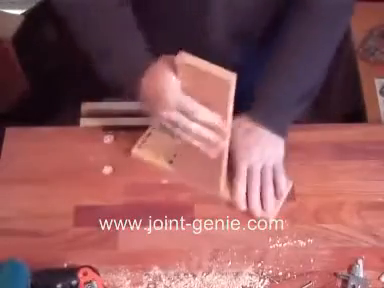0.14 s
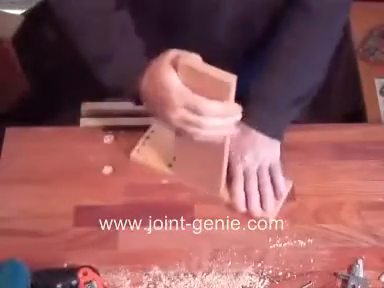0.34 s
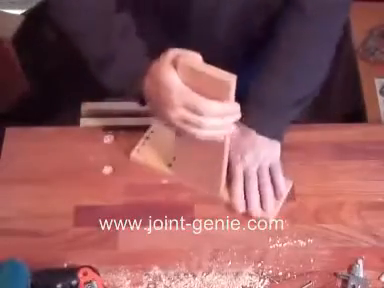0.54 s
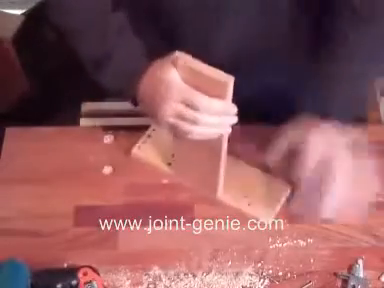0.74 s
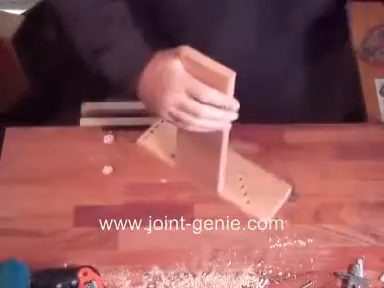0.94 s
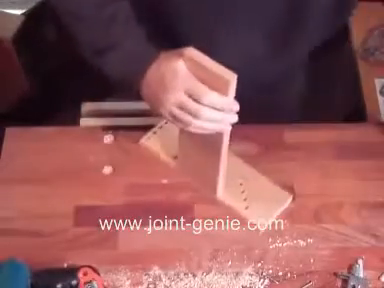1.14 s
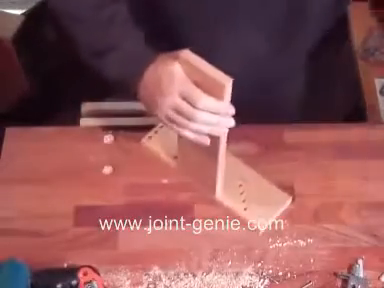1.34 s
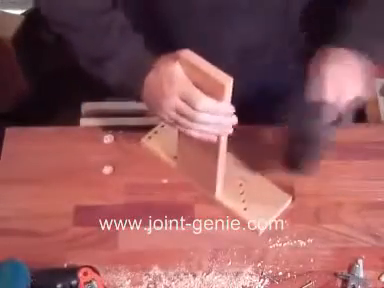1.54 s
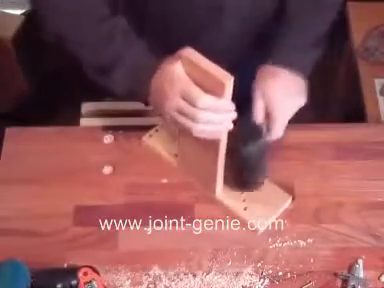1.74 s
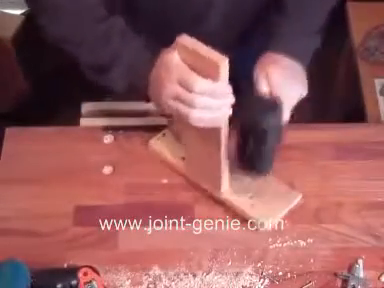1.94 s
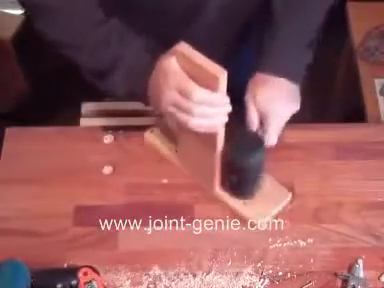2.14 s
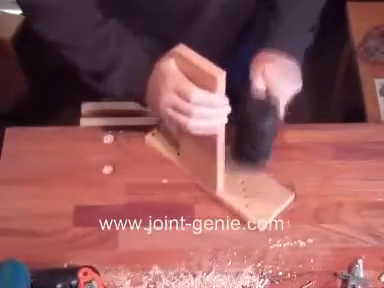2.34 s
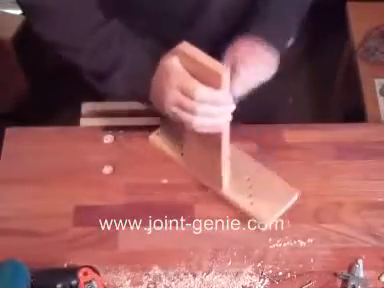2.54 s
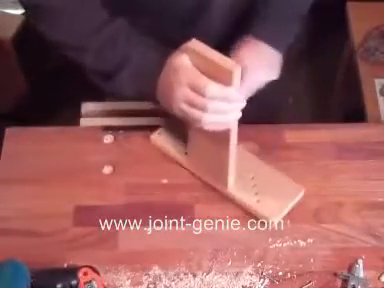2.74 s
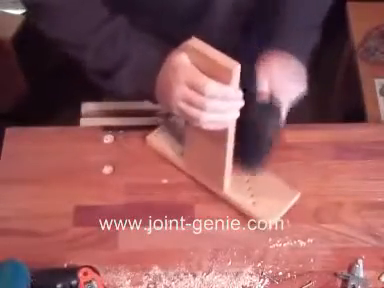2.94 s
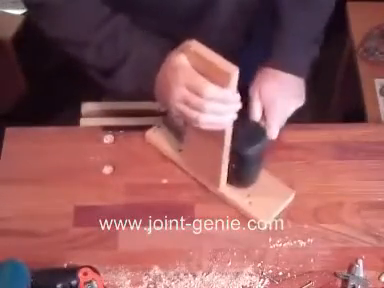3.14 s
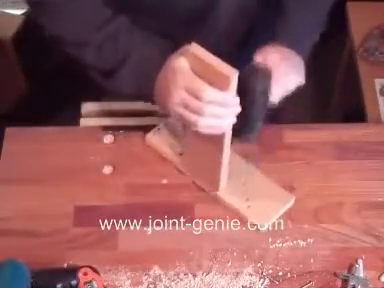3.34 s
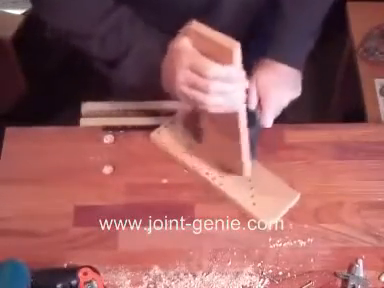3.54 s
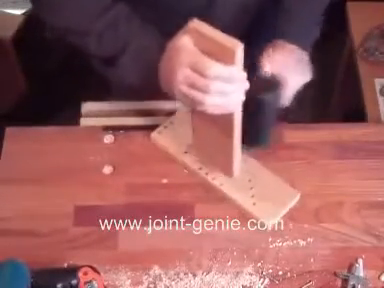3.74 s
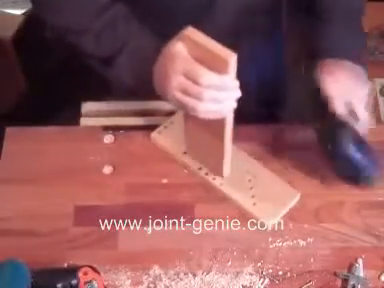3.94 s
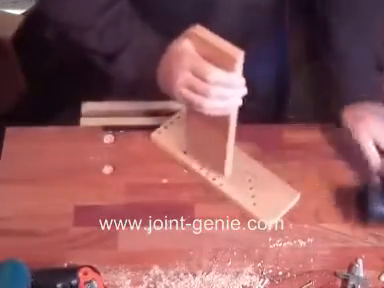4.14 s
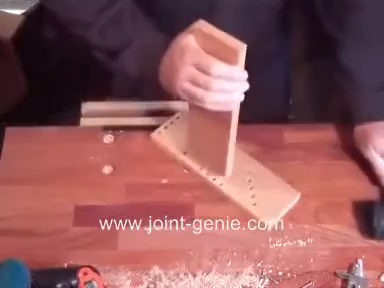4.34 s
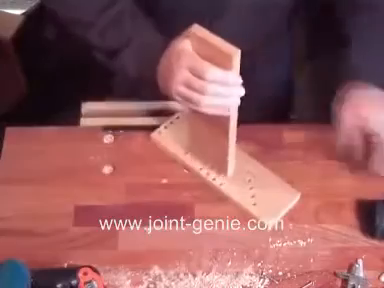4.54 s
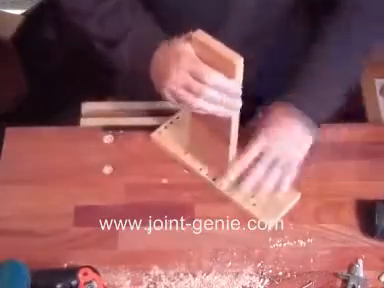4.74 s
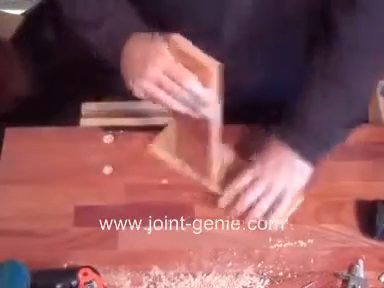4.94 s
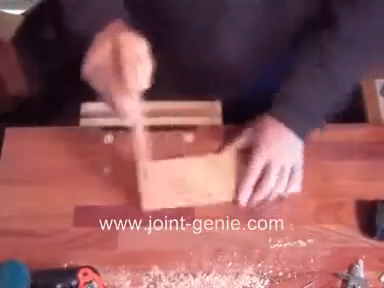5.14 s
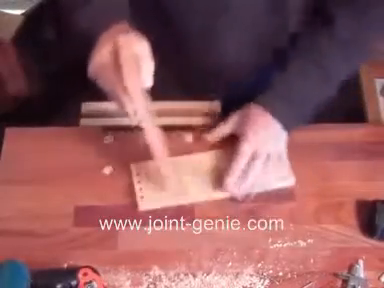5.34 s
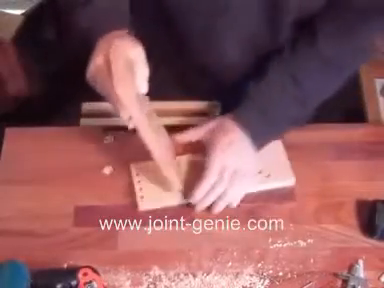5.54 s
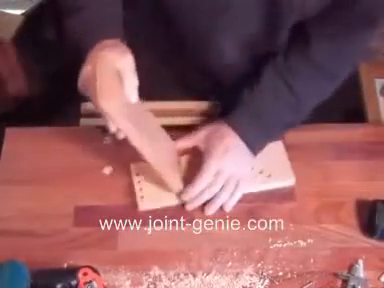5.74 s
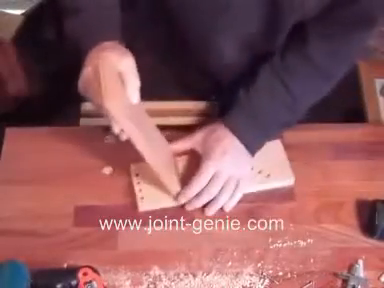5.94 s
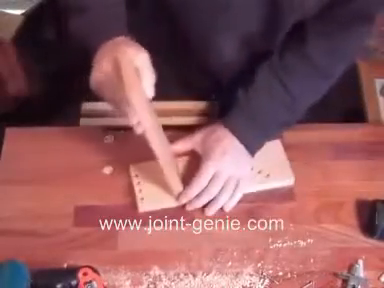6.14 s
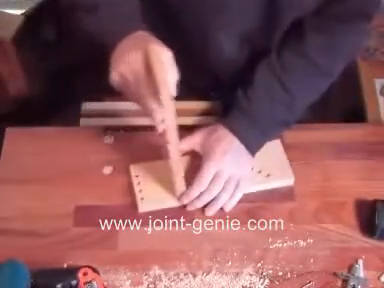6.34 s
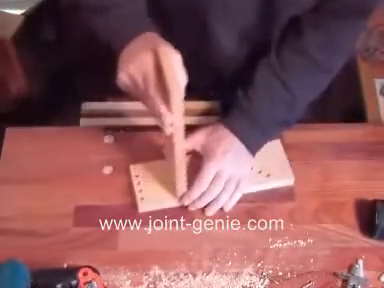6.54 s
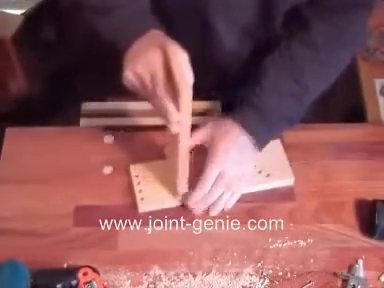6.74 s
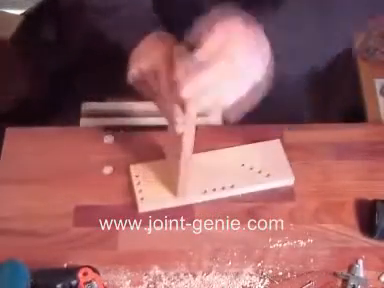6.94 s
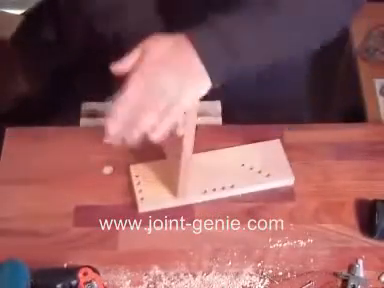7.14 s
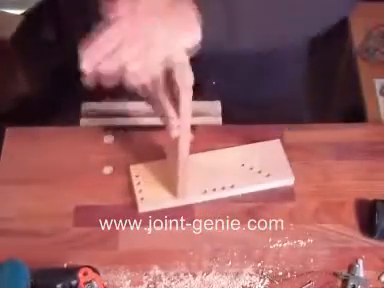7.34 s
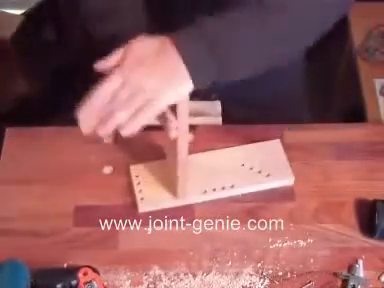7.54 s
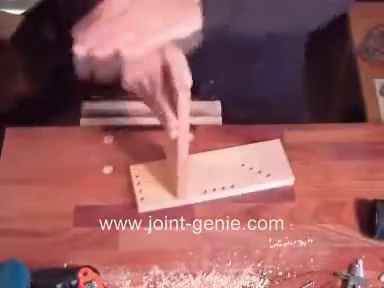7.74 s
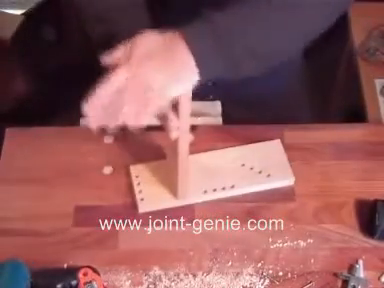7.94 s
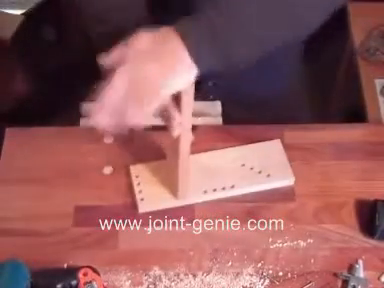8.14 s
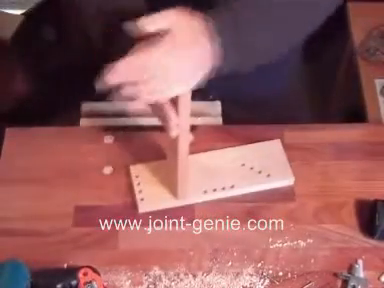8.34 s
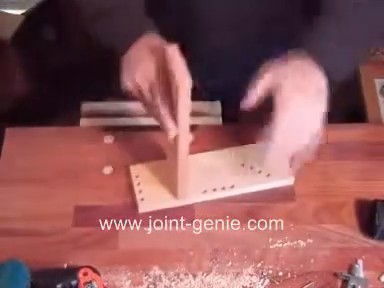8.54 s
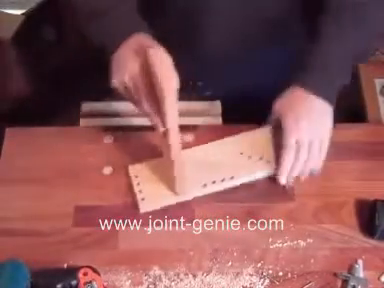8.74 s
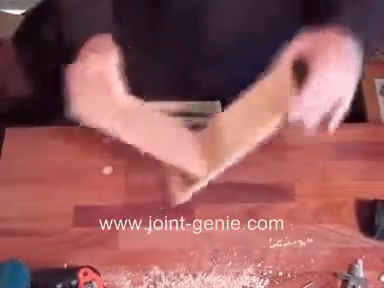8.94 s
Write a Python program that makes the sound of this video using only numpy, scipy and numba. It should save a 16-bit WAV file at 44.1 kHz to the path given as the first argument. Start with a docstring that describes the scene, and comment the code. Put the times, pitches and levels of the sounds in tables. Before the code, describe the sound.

Wooden boards handled on a bench, with short room reverberation and soft air noise. Early knock and brief grainy scrapes, then loud uneven mallet cracks that overload the microphone slightly, soft low thuds, a strong sliding scrape and light ticks. Near the end four regular slaps of a hand seat the board, with thumps, rattles and tinkling steel, then a faint slide.

```python
"""A mallet knocks an upright board out of its dowel joint: noise-like contacts excite damped wood modes.
The boards slide and tick (patchy filtered noise, light knocks) and the mallet is laid down; a palm then
drives the board home in stages while a loose steel part jingles as a sum of decaying sines. Room air and
a wavering low hum lie beneath. The camera lowers its gain too slowly for hard blows, limits the peaks,
and lets the gain back up under the room's tail; it adds faint steady tones of its own."""
import sys
import numpy as np
from scipy import signal
from scipy.fft import rfft, irfft, next_fast_len
from scipy.io import wavfile
from scipy.ndimage import uniform_filter1d, map_coordinates
from numba import njit

SR = 44100
rng = np.random.default_rng(int(sys.argv[2]) if len(sys.argv) > 2 else 0)


def master(y):
    """Save y as 16-bit WAV."""
    cut = np.clip(np.atleast_2d(y).T, -1, 1)
    pcm = np.round(cut * 32767)  # scale
    wavfile.write(sys.argv[1], SR, pcm.astype(np.int16))


N = 395923

# interchannel coherence of sound straight from the source: f/Hz, left-right likeness [0-1]
DIRECT_COHERENCE = [(60, 0.96), (3000, 0.98), (8000, .85), (15000, 0.74)]
# interchannel coherence of diffuse sound: f/Hz, left-right likeness [0-1]
ROOM_COHERENCE = [(60, 0.99), (1400, 0.96), (3100, 0.89), (7000, 0.59), (15000, 0)]


def amp(db):
    """Level to amplitude ratio: 20 dB is a factor of ten."""
    return 10 ** (np.asarray(db) / 20)


def unit(x):
    """Normalisation to an rms of one."""
    return x / np.sqrt(np.mean(x ** 2) + 1e-20)


def along(points, hz):
    """Interpolation of (f/Hz, value) points on a logarithmic frequency axis."""
    f, values = np.transpose(points)
    return np.interp(np.log(hz + 1), np.log(f + 1), values)


def curve(tables, column, outside):
    """Envelope by linear interpolation of one column of several time tables, then smoothing."""
    out = np.full(N, float(outside))
    t = np.arange(N) / SR
    for rows in map(np.array, tables):
        inside = (t >= rows[0, 0]) & (t <= rows[-1, 0])
        out[inside] = np.interp(t[inside], rows[:, 0], rows[:, column])
    return uniform_filter1d(out, size=400)


def wobble(rate):
    """Slow random modulation: a spline through Gaussian knots, rate knots a second."""
    knots = rng.standard_normal(int(N * rate / SR) + 4)
    return map_coordinates(knots, [np.arange(N) * rate / SR])


def filtered(x, response):
    """Linear filtering: the spectrum of x times a complex response of frequency."""
    n = x.shape[-1]
    padded = next_fast_len(n + SR // 5)
    spectrum = rfft(x, padded) * response(np.fft.rfftfreq(padded, 1 / SR))
    return irfft(spectrum, padded)[..., :n]


def resonances(modes, f):
    """Modal superposition: damped resonators (f/Hz, bandwidth/Hz, level/dB) of alternating sign."""
    total = 0
    for k, (centre, width, db) in enumerate(modes):
        damping = 1j * f * width
        total = total + (-1) ** k * amp(db) * damping / (centre * centre - f * f + damping)
    return total


def causal(points):
    """Minimum phase: folding the cepstrum of (f/Hz, level/dB) points gives a pulse that starts at once."""
    gain = amp(along(points, np.fft.rfftfreq(4096, 1 / SR)))
    cepstrum = irfft(np.log(gain))
    cepstrum[1:2048] *= 2
    cepstrum[2049:] = 0
    return irfft(np.exp(rfft(cepstrum)))


def spread(pair, coherence):
    """Interchannel coherence: unrelated mid and side noises, rotated into a left and a right."""
    def weights(hz):
        angle = np.arccos(np.clip(along(coherence, hz), -1, 1)) / 2
        return np.array([np.cos(angle), np.sin(angle)])

    mid, side = filtered(pair, weights)
    return np.array([mid + side, mid - side])


def patchy(depth_db):
    """Time-frequency modulation: two noises whose strength shifts in short patches of pitch and time."""
    z = signal.stft(rng.standard_normal((2, N)), nperseg=256)[2]
    field = rng.standard_normal(z.shape[1:])
    field = uniform_filter1d(field, size=4, axis=0)
    field = uniform_filter1d(field, size=8, axis=1)
    return signal.istft(z * amp(depth_db * unit(field)), nperseg=256)[1][:, :N]


def add(track, s, sound):
    """Superposition: mix a sound into the track at s seconds."""
    part = track[:, max(round(s * SR), 0):][:, :sound.shape[1]]
    part += sound[:, :part.shape[1]]


def in_room(x, wet_db):
    """Reverberation: convolution with noise whose decay depends on frequency."""
    # main decay: f/Hz, t60/s
    decay_times = [(60, 0.5), (200, 0.42), (1000, 0.4), (3000, 0.4), (8000, 0.33), (14000, 0.16)]
    hz, t, z = signal.stft(rng.standard_normal((2, SR * 2 // 3)), SR, nperseg=256)
    fall_db = -60 * t / along(decay_times, hz)[:, None]
    far_corners = amp(-35.5 + 0.46 * fall_db)  # fainter and slower, so it outlasts the main decay
    build_up = 1 - np.exp(-t / 0.0036)  # over the first walls
    decay = (amp(fall_db) + far_corners) * build_up
    tail = spread(signal.istft(z * decay, SR, nperseg=256)[1], ROOM_COHERENCE)
    tail /= np.linalg.norm(tail[0])
    return amp(wet_db) * signal.fftconvolve(x[None], tail, axes=1)


def knock(hz, thud_db, body_db, crack_db, held_db, lead, rise_s, chatter_s, wet_db):
    """Source-filter impact: a sharp contact and its chatter excite wood modes; the room answers."""
    # modes of boards and bench: f/Hz, bandwidth/Hz, level/dB before damping and random variation
    board_modes = [(113.2, 7.8, 1.5), (263, 26, 5.5), (360, 52, -7), (511, 75, 5.5), (790, 19, -8.5),
                   (1362, 45, 4.5), (1520, 180, -10.5), (1740, 160, 4.5), (2614, 42, -3), (2858, 58, 5),
                   (3683, 680, -10.5), (4915, 210, 4)]
    colour = [(25, thud_db - 16.5), (110, thud_db - 5.5), (300, thud_db), (650, body_db), (1300, 2.5),
              (2400, -3.5), (5200, crack_db), (10000, crack_db - 7.5), (16000, crack_db - 23.5)]
    # a gripping hand or a dull, soft contact such as rubber smothers the ring
    damping_db = held_db + 1.5 * max(thud_db - 17, 0)
    modes = [(c, w, db - damping_db + rng.normal(0, 1.5)) for c, w, db in board_modes]

    def ringing(f):
        struck_piece = 1 + resonances([(hz, 140, 6 - damping_db)], f)
        return struck_piece * (amp(-5) + resonances(modes, f))

    wood = filtered(causal(colour), ringing)
    wood /= np.linalg.norm(wood)

    t = np.arange(SR // 10) / SR
    lumps_db = 5 * np.repeat(rng.standard_normal(len(t) // 70), 70)  # the chatter comes in uneven bursts
    envelope = amp(lumps_db - 60 * t / max(chatter_s, .004)) * (1 - np.exp(-t / max(rise_s, 2e-4)))
    contact = envelope * spread(rng.standard_normal((2, len(t))), DIRECT_COHERENCE)
    contact /= np.linalg.norm(contact[0])
    contact[:, 20] += lead  # the one sharp contact

    sound = in_room(wood, wet_db)
    add(sound, 0, signal.fftconvolve(contact, wood[None], axes=1))
    return sound * np.sqrt(SR / 100)  # unit energy becomes rms 1 over 10 ms


def room_air():
    """Broadband ambient noise: spectrally shaped, partly coherent noise with a slightly unsteady level."""
    # spectrum of the air: f/Hz, relative level per Hz/dB
    air_spectrum = [(15, -25), (25, 3.5), (106, 6), (404, 3), (769, -3), (833, -0.5), (1240, -4.5),
                    (7890, -17.5), (13800, -23), (15000, -35)]
    # coherence of the air: f/Hz, left-right likeness [0-1]
    air_coherence = [(60, 0.96), (300, 0.6), (1400, .5), (7000, 0.55), (15000, 0.27)]
    air = spread(rng.standard_normal((2, N)), air_coherence)
    air = filtered(air, lambda f: amp(along(air_spectrum, f)))
    return amp(-53 + wobble(3)) * unit(air)


def low_hum():
    """Frequency and amplitude modulation: a wavering sine, its phase the integral of its pitch."""
    # swells of the hum: start t/s, end t/s, first f/Hz, last f/Hz, level/dB before wavering
    swells = [(0.36, 1.14, 113, 117, -52.5), (4.726, 4.9, 96, 96, -68.5), (5.807, 6.445, 95, 93, -68.5)]
    fade_s, rest_db = .12, -71
    t = np.arange(N) / SR
    start, end, first, last, db = np.transpose(swells)
    pitch = np.interp(t, np.ravel([start, end], "F"), np.ravel([first, last], "F"))
    level = amp(rest_db)
    for a, b, swell_db in zip(start, end, db):
        outside = np.maximum(np.maximum(a - t, t - b), 0)
        level = level + amp(swell_db) * np.exp(-outside / fade_s)
    phase = 2 * np.pi * np.cumsum(pitch + 3 * wobble(14)) / SR
    return np.sqrt(2) * level * amp(1.5 * wobble(7.5)) * np.sin(phase)


def strokes():
    """Power addition: gains of scrape and rustle, each stroke swelling and fading above the fidgeting."""
    # strokes of boards, hands and sleeves: peak t/s, rise/s and fall/s over one slope span,
    # wood scrape level/dB, skin and cloth rustle level/dB
    stroke_rows = [(0.2, 0.019, 0.059, -57, -45), (0.28, 0.028, 0.027, -53, -42.5),
                   (0.33, 0.042, 0.075, -28.5, -42.5), (0.83, 0.06, 0.096, -38, -44.5),
                   (1.339, 0.089, 0.051, -31, -52), (4.19, 0.1, 0.12, -60, -55),
                   (4.97, 0.051, 0.16, -48.5, -43.5), (5.08, .04, .06, -33, -45.5),
                   (5.13, 0.034, .06, -30.5, -50.5), (5.2, .07, 0.15, -21, -33),
                   (5.34, .06, 0.043, -34, -41.5), (5.73, .03, 0.034, -48, -53.5),
                   (5.8, 0.027, 0.035, -46.5, -48.5), (6.02, 0.065, 0.035, -62, -48.5),
                   (6.78, 0.028, 0.039, -56.5, -50.5), (7.01, .15, 0.104, -60, -50.5),
                   (8.7, 0.15, .07, -47.5, -38), (8.84, 0.1, 0.12, -37, -54.5),
                   (8.95, 0.07, 0.029, -40.5, -45.5)]
    # steady fidgeting, two stretches: t/s, scrape level/dB, rustle level/dB
    fidgeting = [
        [(0.15, -59.5, -65), (0.5, -47.5, -49.5), (0.72, -57.5, -62), (1.15, -59.5, -65.5), (1.45, -61.5, -51),
         (1.96, -46.5, -50.5)],
        [(5.5, -59.5, -63), (5.9, -79.5, -66), (6.3, -80.5, -62), (6.7, -85.5, -62.5), (7.3, -76.5, -72)],
    ]
    slope_db = 20  # the span of a stroke's rise or fall time
    t = np.arange(N) / SR
    scrape_db = curve(fidgeting, column=1, outside=-75)
    rustle_db = curve(fidgeting, column=2, outside=-74.5)
    power = amp([scrape_db, rustle_db]) ** 2
    for s, rise, fall, *db in stroke_rows:
        away = np.where(t < s, (s - t) / max(rise, .005), (t - s) / max(fall, .005))
        shape = amp(-slope_db * np.minimum(away, 5))
        power = power + np.outer(amp(db), shape) ** 2
    return np.sqrt(power)


def slides():
    """Stick-slip friction: wood grain catches in tiny uneven slips; skin and cloth hiss more smoothly."""
    # modes of the dragged board: f/Hz, bandwidth/Hz, level/dB
    scrape_modes = [(900, 230, 0), (1838, 190, 2.5), (2630, 130, 0), (3000, 280, 1), (3316, 720, -7),
                    (4400, 100, -3.5), (4847, 560, -7), (6630, 230, -9.5), (9100, 610, -26.5)]
    # spectrum of skin and cloth: f/Hz, relative level per Hz/dB
    rustle_spectrum = [(1200, -26.5), (2500, -4.5), (5000, -2.5), (9000, 1), (11500, -6), (13500, -18)]
    slips = (rng.random(N) < 900 / SR) * amp(7 * rng.exponential(size=N).clip(0, 3))  # about 900 a second
    catching = 1 + 0.19 * unit(uniform_filter1d(slips, size=24))
    grit = patchy(6.2) * amp(3.5 * wobble(400) + 2.2 * wobble(45)) * catching

    def dragged_board(f):
        bright = resonances(scrape_modes, f) + resonances([(3500, 6000, -20)], f)
        low_cut = 1 + (1300 / (f + 1)) ** 2
        return bright / low_cut + resonances([(420, 400, -16)], f)

    scrape = unit(filtered(spread(grit, DIRECT_COHERENCE), dragged_board))
    hiss = patchy(2.5) * amp(1.5 * wobble(300))
    rustle = unit(filtered(spread(hiss, ROOM_COHERENCE), lambda f: amp(along(rustle_spectrum, f))))
    wood, cloth = strokes()
    near = wood * scrape + cloth * rustle
    return amp(-5.0) * near + in_room(near[0], wet_db=-14)[:, :N]  # the room blurs both


def mallet_blows():
    """Repeated impact: each blow bounces the board, which lands and then rocks down once more."""
    # blows: t/s, force level/dB, ringing f/Hz, thud level/dB, body level/dB, grip damping/dB, chatter t60/s,
    # flight until landing/s, landing level/dB, landing f/Hz, last rock level re landing/dB
    blows = [(0.0005, -9, 1402, 4, 9, -2, 0.01, .047, -22, 1470, -9.5),
             (1.978, -3.5, 1500, 4, 1, 6.5, 0.0083, 0.019, -14.5, 1500, -16),
             (2.247, 4, 1337, -9.5, -0.5, 1.5, 0.017, .037, 2.5, 1897, -13),
             (2.755, 6.5, 1250, 1.5, -3.5, 1, 0.01, 0.019, -4.5, 1939, 0.5),
             (3.18, -8.5, 1013, -4, 4, -0.5, .012, .022, -4, 1799, -21),
             (3.619, 16, 2568, -14, -7, 0, 0.047, 0.017, -9.5, 1804, -9)]
    strike_crack_db, landing_crack_db, landing_dull_db = -10.5, -15, -2.5
    settle_s, settle_hz, settle_thud_db = .027, 1330, 9  # the last rock has a fuller thud
    out = np.zeros((2, N))
    for s, db, hz, thud, body, held_db, chatter, flight, land_db, land_hz, settle_db in blows:
        land_thud, land_body = thud + landing_dull_db, body + landing_dull_db
        land_s = s + flight
        impacts = [
            (s, db, hz, thud, body, strike_crack_db),
            (land_s, land_db, land_hz, land_thud, land_body, landing_crack_db),
            (land_s + settle_s, land_db + settle_db, settle_hz,
             land_thud + settle_thud_db, land_body, landing_crack_db)]
        for at, force_db, *timbre in impacts:
            sound = knock(*timbre, held_db, lead=0.15, rise_s=0.00036, chatter_s=chatter, wet_db=-7)
            add(out, at, amp(force_db) * sound)
    return out


def light_contacts():
    """Weak impact excitation: light knocks, and faint ticks of edges and fingertips, ring the wood."""
    # knocks of boards and of the rubber mallet laid down: t/s, level/dB, ringing f/Hz, thud level/dB,
    # body level/dB
    light_knocks = [(0.367, -26.5, 606, -3, 3.5), (1.06, -29, 1500, -2, 14.5), (3.508, -22, 530, -9, -3),
                    (3.521, -30, 1632, -13.5, -2.5), (4.429, -24.5, 254, 23.5, 5.5),
                    (4.457, -20.5, 256, 38, 23.5), (4.515, -21.5, 293, 33, 29.5),
                    (4.523, -22, 437, 18, 18.5), (4.608, -16.5, 1105, 3.5, 10), (4.63, -27, 818, 4, 28.5),
                    (5.783, -34, 430, 27.5, 22), (8.633, -39, 1580, -14, 11)]
    # ticks: t/s, level/dB, ringing f/Hz, thud level/dB
    ticks = [(0.075, -49, 6150, 7), (0.181, -42.5, 6200, 5), (0.198, -39, 5600, 6.5),
             (0.226, -45, 3480, 13), (0.691, -50.5, 1270, -1.5), (0.75, -48, 1270, 8.5),
             (0.934, -41, 550, 8.5), (1.216, -45, 573, 12), (1.346, -40, 560, -0.5), (1.475, -53, 2980, 4),
             (5.166, -33.5, 5140, -6), (5.179, -34, 2500, -8), (5.421, -53.5, 3560, 6),
             (5.512, -49.5, 4780, 3), (5.527, -48, 940, -4.5), (5.564, -48, 3450, 5),
             (5.609, -42, 526, 9.5), (5.667, -48, 3480, 11), (6.77, -51, 530, 1), (7.023, -53.5, 263, 36),
             (8.885, -48, 517, 9)]
    contacts = []
    for s, db, hz, thud, body in light_knocks:
        contacts.append((s, db, hz, thud, body, -21 - .25 * thud))  # a duller knock has less crack
    for s, db, hz, thud in ticks:
        contacts.append((s, db, hz, thud, 3 + 0.86 * thud, -2))
    out = np.zeros((2, N))
    for s, db, *timbre in contacts:
        sound = knock(*timbre, held_db=0.0, lead=1.0, rise_s=0.00074, chatter_s=0.026, wet_db=-5)
        add(out, s, amp(db) * sound)
    return out


def palm_slaps():
    """Successive impacts: skin slaps, the board seats, the bench thumps, the board rebounds and rattles."""
    # slaps: t/s, skin level/dB, lag until the board seats/s, force level/dB, thump f/Hz, thump level/dB,
    # rebound level/dB
    slaps = [(7.331, -19.5, .014, -13.5, 460, -13.5, -14.5), (7.655, -11.5, .013, -10.5, 485, -8.5, -15.5),
             (7.986, -7.5, .011, -4.5, 826, -7.5, -13), (8.333, -12, .003, -1.5, 556, -4, -10.5)]
    # slap of the skin: ringing f/Hz, thud level/dB, body level/dB, crack level/dB
    skin_timbre = (1576, 17, 5, -1)
    # seating, thump, rebound: delay after seating/s, thud level/dB, body level/dB, crack level/dB
    seating = [(0, 7.5, 4.5, -13.5), (.009, 11, 2.5, -11), (.038, 13.5, 5.5, -12.5)]
    skin_rise_s, seat_hz = .003, 1510
    rattles, rattle_s, rattle_db = 3, .09, -12  # contacts, span, level re force
    rattle_low_hz, rattle_high_hz, rattle_fade_db = 400, 1810, -7.5  # the fade is over the whole span
    out = np.zeros((2, N))
    for s, skin_db, lag, db, thump_hz, thump_db, rebound_db in slaps:
        skin = knock(*skin_timbre, held_db=2.5, lead=0, rise_s=skin_rise_s, chatter_s=0.036, wet_db=-4.5)
        add(out, s - skin_rise_s, amp(skin_db) * skin)
        seated_s = s + lag
        stages = zip(seating, (seat_hz, thump_hz, seat_hz), (db, thump_db, rebound_db))
        for (after, *timbre), hz, force_db in stages:
            stage = knock(hz, *timbre, held_db=1.5, lead=0.48, rise_s=0.0013, chatter_s=0.023, wet_db=-6)
            add(out, seated_s + after, amp(force_db) * stage)
        for late, tone in rng.random((rattles, 2)):
            hz = rattle_low_hz + (rattle_high_hz - rattle_low_hz) * tone
            rattle = knock(hz, *seating[-1][1:], held_db=5, lead=0.88, rise_s=.001, chatter_s=0.013,
                           wet_db=-3)
            at = seated_s + seating[1][0] + late * rattle_s
            add(out, at, amp(db + rattle_db + rattle_fade_db * late) * rattle)
    return out


def steel():
    """Modal ringing: decaying sines of a hopping steel part, roughened by the chatter of its landing."""
    # landings: t/s, relative level/dB
    jingles = [(7.385, -48.5), (7.694, -20), (8.072, -23.5), (8.353, -20), (8.389, -11), (8.597, -57),
               (8.611, -38)]
    # steel modes: f/Hz, relative level/dB before random variation, t60/s
    steel_modes = [(5480, 0, .045), (6670, -4, .06), (7800, 0, .045), (8350, -9, .035), (9880, -8, .04),
                   (12070, -14, .045)]
    out = np.zeros((2, N))
    t = np.arange(SR // 6) / SR
    for s, db in jingles:
        ring = 0
        for hz, level, t60 in steel_modes:
            level_db = level + rng.normal(0, 2.5, (2, 1))  # differs between left and right
            ring = ring + amp(level_db - 60 * t / t60) * np.sin(2 * np.pi * hz * t)
        landing = amp(-60 * t[:1200] / .05) * rng.standard_normal(1200)
        ring = amp(db) * signal.fftconvolve(ring, unit(landing)[None] / 32, axes=1)
        add(out, s, ring)
        add(out, s, in_room(ring[0], wet_db=-17))
    return out


def scene():
    """Linear superposition of all the sources."""
    background = room_air() + low_hum()
    impacts = mallet_blows() + light_contacts() + palm_slaps()
    return background + slides() + impacts + steel()


@njit
def ride(level, limit, smooth, fall_db, rise_db):
    """Feedback gain control: gain steps down while the smoothed output exceeds the limit, else recovers."""
    gain_db, seen, out = 0., 0., np.empty(len(level))
    for i in range(len(level)):
        out[i] = 10 ** (gain_db / 20)
        seen += smooth * (min(level[i] * out[i], 1.) - seen)
        if seen > limit:
            gain_db = gain_db - fall_db
        else:
            gain_db = min(gain_db + rise_db, 0.)
    return out


def record(dry):
    """Nonlinear limiting: gain control too slow for the blows, soft clipping, camera tones, band limit."""
    # camera tones: f/Hz, level/dB before wavering, right gain over left [ratio, negative is inverted]
    whines = [(840, -69, 1), (8043, -80, 1), (15622, -63, -.5)]
    smoothing_s, fall_db_per_s, rise_db_per_s = 0.0041, 900, 160
    top_hz = 16010
    level = np.abs(dry).mean(axis=0)
    gain = ride(level, amp(-8.0), 1 / (smoothing_s * SR), fall_db_per_s / SR, rise_db_per_s / SR)
    hot = dry * gain
    out = hot / (1 + np.abs(hot / .97) ** 8) ** (1 / 8)  # peaks saturate at 0.97
    t = np.arange(N) / SR
    for hz, db, right in whines:
        tone = np.sqrt(2) * amp(db + 1.5 * wobble(40)) * np.sin(2 * np.pi * hz * t)
        out = out + tone * [[1], [right]]
    return filtered(out, lambda f: f < top_hz)


dry = scene()
out = record(dry)
master(out)
```